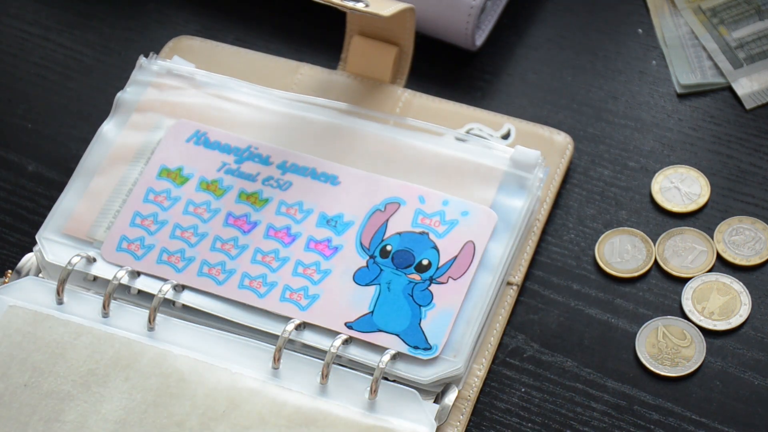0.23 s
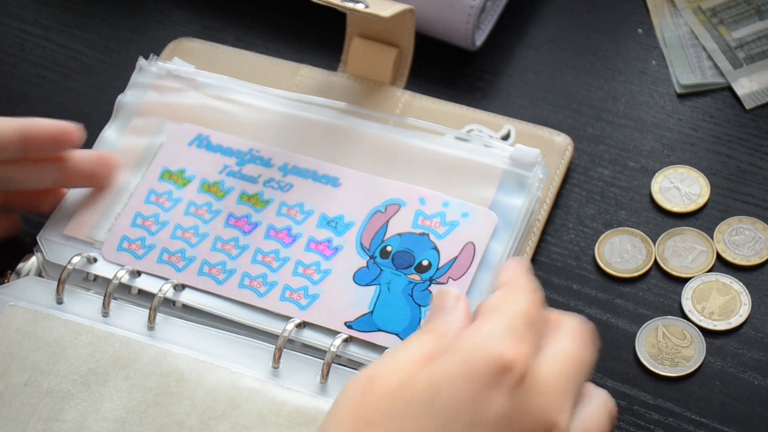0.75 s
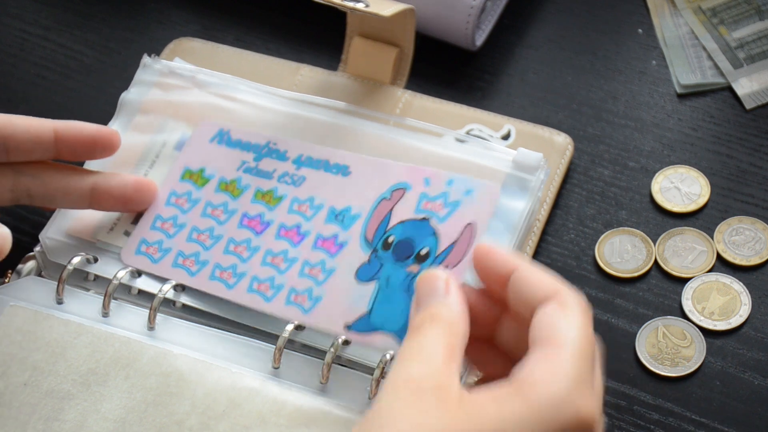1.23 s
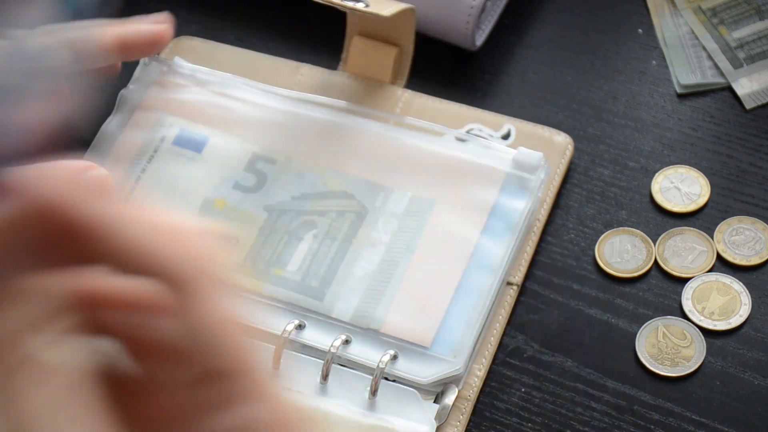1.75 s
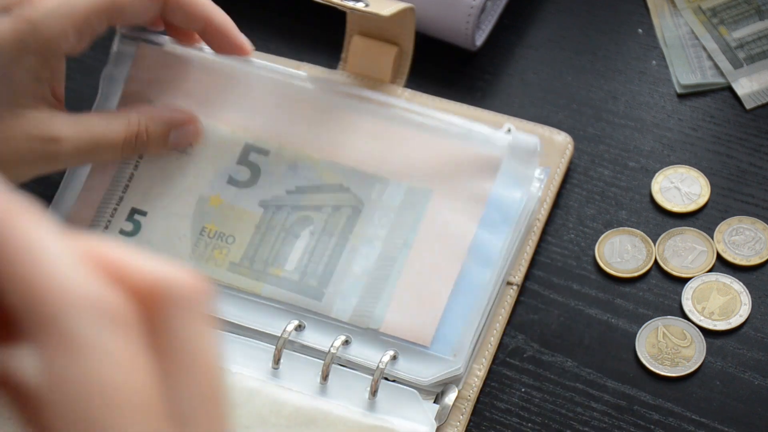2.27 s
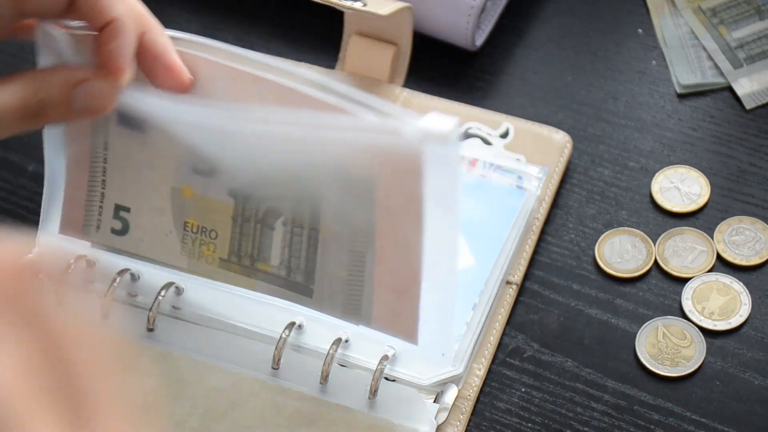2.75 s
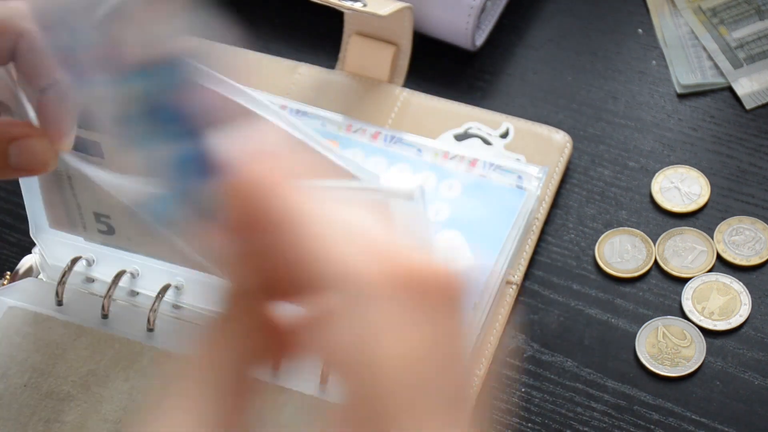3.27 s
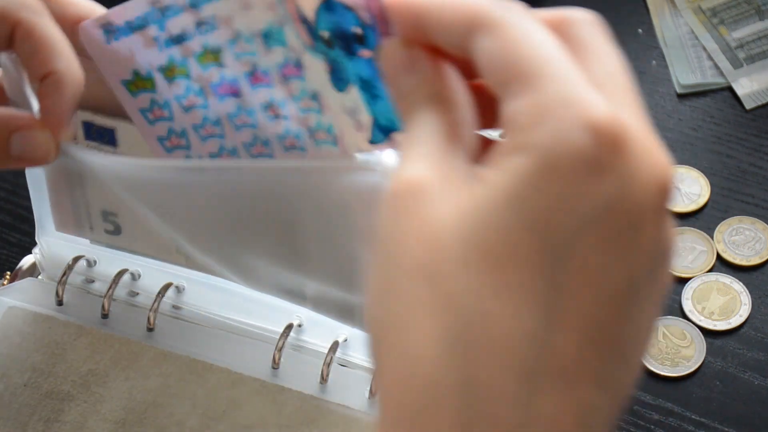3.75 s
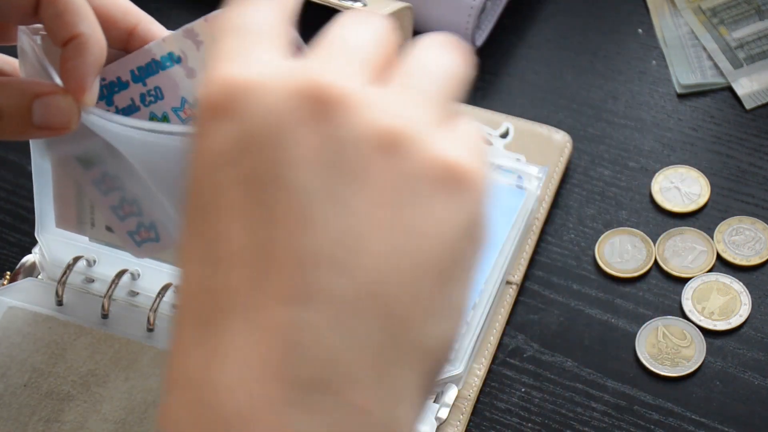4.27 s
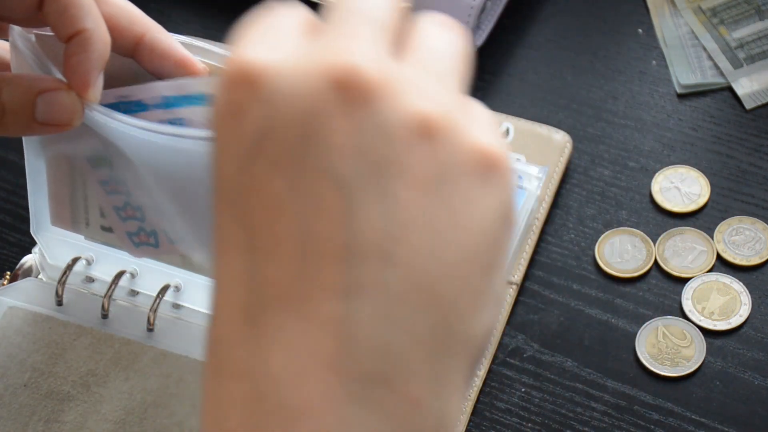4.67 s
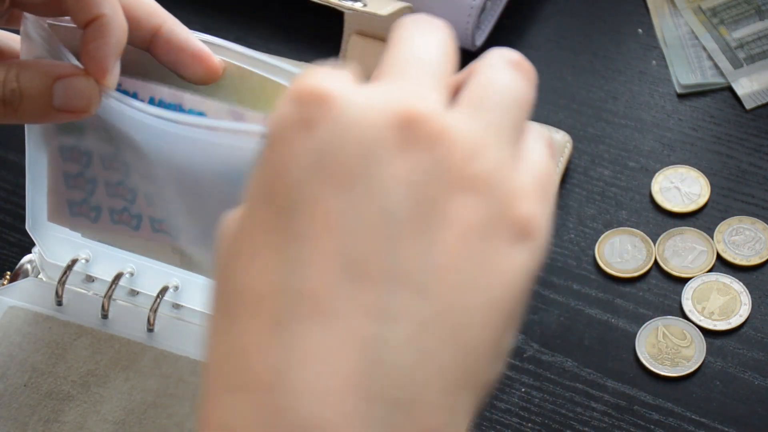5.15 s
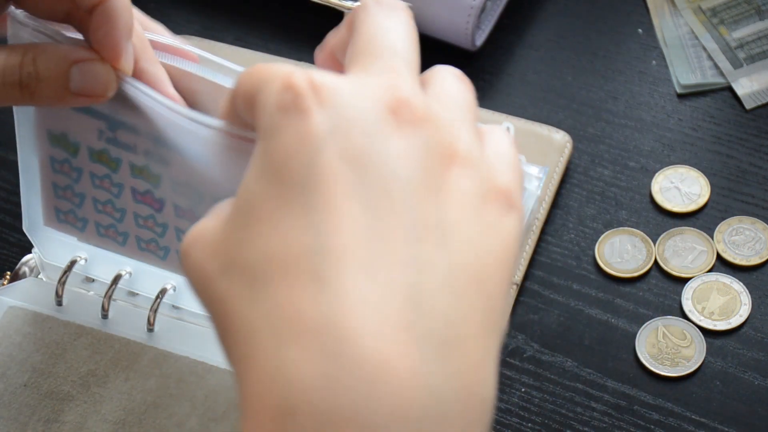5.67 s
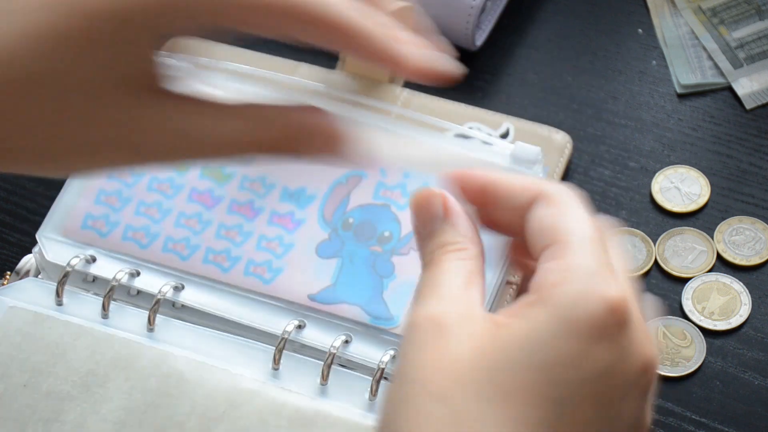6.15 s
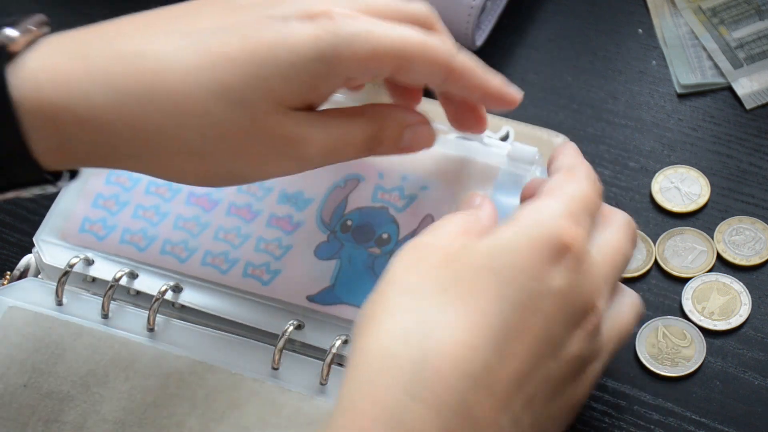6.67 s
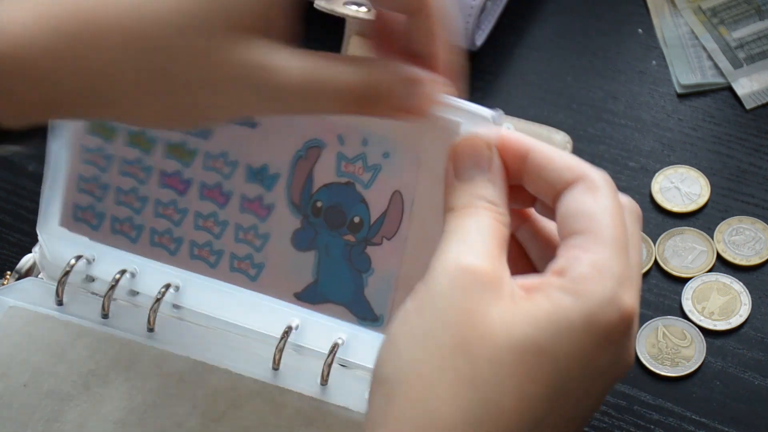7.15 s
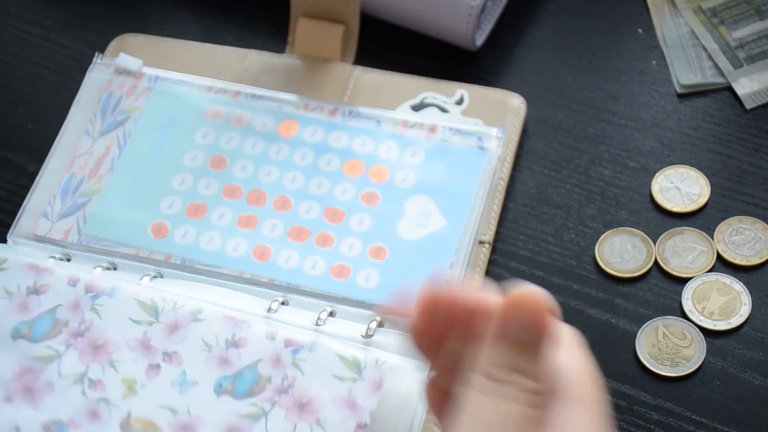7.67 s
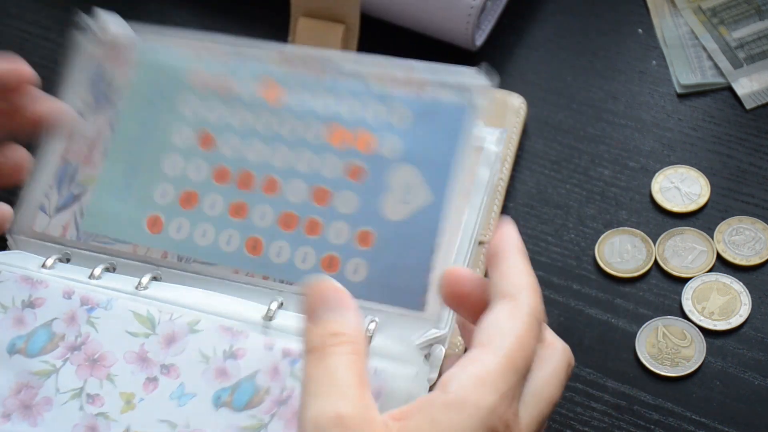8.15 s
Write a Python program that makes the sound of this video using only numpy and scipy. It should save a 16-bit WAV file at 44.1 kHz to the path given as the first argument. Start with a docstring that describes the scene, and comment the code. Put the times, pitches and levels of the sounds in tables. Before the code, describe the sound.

A hard clap on a table rings briefly, then a stiff plastic sheet wobbles with rising whups before pouches rustle, slide and tick in a small room.

```python
"""Plastic pouches in a ring binder are handled at a table in a small, live room, over quiet, dull room noise.
Near the start something hard claps down and rebounds: noise bursts, a ringing table top and low thumps.
Then a stiff plastic sheet wobbles to and fro with rising whups, each a sine sweeping upward with a noisy pop.
Last, the sheet slides into a pouch and pages turn: swells of grainy noise rustle, short noise bursts tick
on the rings, and low, dying sines knock softly; a few of these sound earlier too."""
import sys
import numpy as np
from scipy import signal
from scipy.fft import rfft, irfft, next_fast_len
from scipy.io import wavfile
from scipy.ndimage import map_coordinates

SR = 44100
rng = np.random.default_rng(int(sys.argv[2]) if len(sys.argv) > 2 else 0)


def output_pcm(signal):
    """Save a mono or channel-first signal as 16-bit PCM at the path in sys.argv[1].

    Samples are clipped to [-1, 1] before scaling.
    """
    pcm = np.clip(np.atleast_2d(signal).T, -1, 1) * 32767
    wavfile.write(sys.argv[1], SR, np.round(pcm).astype(np.int16))


N = 371275  # length in samples


def amp(db):
    """Decibels to gain."""
    return 10 ** (np.asarray(db) / 20)


def unit(x):
    """Scale to rms 1."""
    return x / np.sqrt(np.mean(x ** 2) + 1e-20)


def along(points, hz):
    """Read a curve of (Hz, value) points on a logarithmic frequency axis."""
    point_hz, values = np.transpose(points)
    return np.interp(np.log(hz + 1), np.log(point_hz + 1), values)


def colour(x, points):
    """Minimum-phase filter with the given (Hz, dB) gain, so nothing sounds before its cause."""
    size = 2 * next_fast_len(len(x) // 2 + 2048)
    gain = amp(along(points, np.fft.rfftfreq(size, 1 / SR)))
    # folding the cepstrum onto positive time makes the filter causal
    cepstrum = irfft(np.log(gain))
    cepstrum[1:size // 2] *= 2
    cepstrum[size // 2 + 1:] = 0
    response = np.exp(rfft(cepstrum))
    return irfft(rfft(x, size) * response)[:len(x)]


def add(track, start_s, sound):
    """Mix a sound into the track, cut off at the track's end."""
    part = track[round(start_s * SR):][:len(sound)]
    part += sound[:len(part)]


def wobble(rate):
    """A smooth random curve through `rate` random knots a second."""
    knots = rng.standard_normal(int(N * rate / SR) + 4)
    return map_coordinates(knots, [np.arange(N) * rate / SR])


# How long the room rings. Each row: frequency in Hz, time to fall by 60 dB in seconds.
ROOM_DECAY = [(100, 0.32), (400, 0.37), (1000, 0.38), (2000, 0.39), (5000, 0.36), (12000, 0.29)]


def reflections(early_db, tail_db):
    """A quick scatter off the table and near walls, then a room tail that dies at its own pace in each band."""
    hz, frame_s, bands = signal.stft(rng.standard_normal(SR // 2), SR, nperseg=256)
    decay = amp(-60 * frame_s / along(ROOM_DECAY, hz)[:, None])
    tail = signal.istft(bands * decay, SR, nperseg=256)[1]
    t = np.arange(len(tail)) / SR
    tail *= 1 - np.exp(-t / 0.0034)
    # cubed noise is spiky, like separate early echoes
    early = rng.standard_normal(len(t)) ** 3
    early *= amp(-60 * t / 0.15) * (1 - np.exp(-(t / 0.0018) ** 2))
    return amp(tail_db) * tail / np.linalg.norm(tail) + amp(early_db) * early / np.linalg.norm(early)


def burst(t60, spectrum, early_db, tail_db):
    """A dying crack of coloured noise in the room, with the energy of 4 ms at rms 1."""
    echo = reflections(early_db, tail_db)
    t = np.arange(len(echo)) / SR
    crack = rng.standard_normal(len(echo)) * amp(-60 * t / t60)
    x = colour(crack / np.linalg.norm(crack) + echo, spectrum)
    return x / np.linalg.norm(x) * np.sqrt(.004 * SR)


def friction(spectrum, slips_per_s, grain_db):
    """Coloured noise of rms 1 with tiny stick-slip grains in it."""
    slips = (rng.random(N) < slips_per_s / SR) * rng.standard_normal(N)
    rough = amp(grain_db) * unit(slips) + rng.standard_normal(N)
    return unit(colour(rough, spectrum))


# Tone of the room noise. Each row: frequency in Hz, gain in dB.
AIR_TONE = [(20, -13), (50, -9), (110, -3), (220, -1.5), (420, -2), (800, -1), (1300, -4), (2000, -7.5),
            (3200, -14.5), (5000, -23), (7500, -27), (12500, -31), (13500, -44.5), (15500, -42)]
AIR_DB = -65.5  # rms level around which the noise drifts


def air():
    """Dull room noise whose level drifts very slightly."""
    noise = unit(colour(rng.standard_normal(N), AIR_TONE))
    return amp(AIR_DB + 0.72 * wobble(3.8)) * noise


# Low thumps: the first two under the clap, the rest soft knocks on binder and table.
# Each row: start in seconds, level in dB, pitch in Hz.
THUMPS = [(.410, -51, 105), (0.411, -38, 237), (.763, -59, 112), (0.917, -49.5, 117), (3.782, -49, 340),
          (3.857, -53.5, 275), (5.928, -52, 112), (7.307, -56, 102), (7.871, -56, 106), (8.348, -52, 115)]


def bumps(t60=0.1):
    """Low thumps under the clap, then soft knocks on binder and table: quickly dying sines with a round onset."""
    out, t = np.zeros(N), np.arange(SR // 4) / SR
    for start_s, db, hz in THUMPS:
        thump = np.sin(2 * np.pi * hz * t) * amp(-60 * t / t60) * (1 - np.exp(-t / 0.0077))
        add(out, start_s, amp(db) * thump)
    return out


# Strokes of sliding plastic, as bell-shaped swells, also used by the creases.
# Each row: middle in seconds, spread in seconds, rub in dB, hiss in dB (both before the layer trims).
SLIDES = [(0.399, 0.017, -50, -60.5), (0.775, 0.059, -70.5, -81), (1.223, 0.053, -67.5, -78.5),
          (3.809, 0.024, -61, -75), (3.991, 0.063, -70, -72), (4.425, .03, -69.5, -95),
          (4.62, 0.1, -74, -79), (4.741, .03, -68.5, -81), (4.92, .04, -65.5, -78.5),
          (5.149, .045, -61.5, -75.5), (5.673, 0.073, -74, -83), (5.823, .015, -68, -77.5),
          (5.955, 0.038, -73, -81), (6.922, 0.021, -74, -83), (7.321, 0.055, -64.5, -76.5),
          (7.538, 0.044, -53.5, -67.5), (7.864, 0.11, -69, -77), (8.207, .018, -59.5, -74),
          (8.356, 0.047, -67, -76)]
# Between strokes the hands keep shifting on the pouches.
# One row: middle in seconds, spread in seconds, rub in dB, hiss in dB (both before the layer trims).
SHIFTING = (5.5, 9, -76, -94)
# A sliding edge briefly sings at one resonance.
# Each row: middle in seconds, spread in seconds, pitch in Hz, level in dB before the stroke's reflections.
SINGING_EDGES = [(3.99, 0.077, 1770, -68.5), (4.024, 0.018, 2470, -63.5), (4.638, 0.016, 1690, -56.5),
                 (7.316, .04, 860, -60.5), (7.85, 0.044, 5830, -77), (7.91, 0.048, 2280, -65.5),
                 (8.365, 0.011, 810, -57.5)]
# Tone of the dull rub. Each row: frequency in Hz, gain in dB.
RUB_TONE = [(50, -18.5), (100, -3.5), (180, -4.5), (300, -5), (500, -5.5), (850, -1.5), (1200, -5.5),
            (1800, -0.5), (3000, -14), (4500, -23), (8000, -45)]
# Tone of the hissing skin. Each row: frequency in Hz, gain in dB.
HISS_TONE = [(1200, -24), (2300, 2), (4200, 12), (6500, 1.5), (10000, -1.5), (13000, -4.5), (16000, -24)]
# Tone of crinkling plastic, also the snap of the creases. Each row: frequency in Hz, gain in dB.
CRINKLE_TONE = [(600, -13), (1800, 5.5), (3000, 24.5), (4500, -7), (7000, -6.5), (13000, -35)]


def rustle(rub_db=-1, hiss_db=-1, crinkle_db=-1, scrape_width=0.064):
    """Each stroke swells and fades: a dull rub, hiss and crinkles from the pouch's skin, at times a singing edge."""
    t = np.arange(N) / SR

    def swell(middle_s, spread_s):
        """A bell-shaped rise and fall."""
        return np.exp(-np.minimum(((t - middle_s) / spread_s) ** 2 / 2, 20))

    strokes = SLIDES + [SHIFTING]
    pressure = sum(amp(db) * swell(middle_s, spread_s) for middle_s, spread_s, db, _ in strokes)
    speed = sum(amp(db) * swell(middle_s, spread_s) for middle_s, spread_s, _, db in strokes)
    rub = amp(rub_db) * pressure * friction(RUB_TONE, slips_per_s=200, grain_db=-3.5)
    hiss = amp(hiss_db) * speed * friction(HISS_TONE, slips_per_s=450, grain_db=-6.0)
    # sparse, strong grains make the crackle
    crinkle = amp(crinkle_db) * speed * friction(CRINKLE_TONE, slips_per_s=70, grain_db=20)
    out = (rub + hiss + crinkle) * amp(1.03 * wobble(35))  # the level wavers slightly
    for middle_s, spread_s, hz, db in SINGING_EDGES:
        band = [hz * (1 - scrape_width), hz * (1 + scrape_width)]
        edge = signal.butter(2, band, "band", fs=SR, output="sos")
        singing = unit(signal.sosfilt(edge, rng.standard_normal(N)))
        out += amp(db) * swell(middle_s, spread_s) * singing
    return out + signal.fftconvolve(out, reflections(early_db=-6.5, tail_db=-13.0))[:N]


# Hollow body of a crease, a tick or the sheet's pop. Each row: frequency in Hz, gain in dB.
BODY_TONE = [(80, -20), (250, -5.5), (600, 2), (1100, 1.5), (1900, 1), (3000, -7.5), (4500, -25.5),
             (9000, -39)]


def creases(count=4, body_db=13, snap_db=5, scatter_db=5):
    """Every stroke flips a few small creases at chance moments; a stroke with more hiss flips them harder."""
    flips = np.zeros(N)
    for middle_s, spread_s, _, hiss_db in SLIDES:
        for when, size in rng.uniform(-1, 1, (count, 2)):
            add(flips, middle_s + 1.3 * spread_s * when, [amp(hiss_db + scatter_db * size)])
    body = burst(.008, BODY_TONE, early_db=-8, tail_db=-6)
    snap = burst(.004, CRINKLE_TONE, early_db=-14, tail_db=-10)
    return signal.fftconvolve(flips, amp(body_db) * body + amp(snap_db) * snap)[:N]


# Creases flip and pouch edges catch.
# Each row: start in seconds, body in dB, snap in dB, tilt of the snap's tone in dB per octave.
CATCHES = [(0.362, -48, -45, -3), (0.3758, -49, -47.5, 1.5), (0.4092, -31, -35.5, 2.5),
           (0.4749, -28, -37, -9), (.763, -54.5, -69, 4), (1.166, -55.5, -60, -14), (1.212, -50, -64, 7),
           (1.720, -65, -67.5, 6), (3.8544, -47, -57, -11.5), (4.002, -63, -58.5, 0), (4.373, -59, -72, 3),
           (4.56, -56.5, -71, -3), (4.6228, -48, -57.5, -2), (4.910, -69, -65, -5), (5.823, -58, -65, 1),
           (5.952, -62, -63.5, -3), (6.092, -44.5, -47.5, -4.5), (6.097, -48, -57, 8),
           (6.908, -55, -67, -2), (7.307, -66, -55.5, 9), (7.432, -54, -64.5, -1), (7.545, -35.5, -62, 9),
           (7.668, -47.5, -58, 5), (7.674, -50.5, -51.5, -8), (7.894, -54, -70, -9),
           (7.9028, -52.5, -63, -10), (8.139, -49, -74, -14), (8.143, -48, -68, -9),
           (8.2462, -42.5, -61, -2), (8.3183, -47, -65, -2), (8.3439, -40, -53, 3)]
# Tone of the snap before its tilt. Each row: frequency in Hz, gain in dB.
SNAP_TONE = [(1000, -32.5), (2500, 5), (3500, 6.5), (4700, 4), (6000, -1), (9000, -5), (12000, -15),
             (16000, -26)]


def ticks():
    """Creases flip and pouch edges catch on the rings: a sharp noise snap over a hollow body."""
    out = np.zeros(N)
    for start_s, body_db, snap_db, tilt in CATCHES:
        tilted = [(hz, db + tilt * np.log2(hz / 5000)) for hz, db in SNAP_TONE]  # pivots at 5 kHz
        add(out, start_s, amp(body_db) * burst(0.013, BODY_TONE, early_db=-6, tail_db=-4.0))
        add(out, start_s, amp(snap_db) * burst(.007, tilted, early_db=-12, tail_db=-8))
    return out


# The blow and its rebounds. Each row: start in seconds, level in dB.
BLOWS = [(0.4074, -16.5), (0.4156, -25.5), (0.4332, -21.5), (0.4758, -31.5)]
# Modes of the table top. Each row: frequency in Hz, relative level in dB, time to fall by 60 dB in seconds.
TABLE_MODES = [(579, -1, 0.23), (680, -6, 0.37), (739, -2, 0.2), (893, -4.5, 0.37), (1080, 15, 0.25),
               (1000, -1.5, 0.22), (1047, -4.5, 0.43), (1128, 9, 0.14), (1573, 0, 0.18), (1640, 7.5, 0.39),
               (1580, -4, 0.62), (1707, 2, 0.28), (1840, -15, .3), (1971, -10, 0.16), (2200, -16, .36),
               (2460, -6, 0.47)]
# Tone of the broad thud. Each row: frequency in Hz, gain in dB.
THUD_TONE = [(40, -41), (100, -7.5), (180, -14.5), (350, -16.5), (550, -1), (1000, 0.5), (1500, 0.5),
             (2100, -0.5), (2900, -17.5), (4300, -17), (6000, -31.5), (10000, -38), (15000, -64)]


def clap(ring_db=-8):
    """A hard flat blow: a broad noise thud and the table top ringing as dying sines."""
    out, t = np.zeros(N), np.arange(SR // 2) / SR
    for start_s, db in BLOWS:
        ring = np.zeros(len(t))
        for hz, mode_db, t60 in TABLE_MODES:
            ring += amp(mode_db - 60 * t / t60) * np.sin(2 * np.pi * (hz * t + rng.random()))
        ring *= (1 - np.exp(-t / .002)) / np.max(np.abs(ring))
        add(out, start_s, amp(db) * burst(0.058, THUD_TONE, early_db=-2.0, tail_db=-1.5))
        add(out, start_s, amp(db + ring_db) * ring)
    return out


# The sheet buckles hard once in every swing, then pops right through.
# Each row: start in seconds, level in dB before the sheet's own tone and trim, bend time in seconds,
# wait until it pops through in seconds.
HARD_BUCKLES = [(2.0100, -24, 0.0065, .002), (2.2988, -25, .010, 0.0088), (2.565, -23, 0.0051, 0.008),
                (2.8373, -23.5, 0.0093, .008), (3.084, -22.5, .007, .013)]
BUCKLE_FROM_HZ, BUCKLE_TO_HZ = 482, 2175  # every buckle sweeps through the same range
# Popping through is quicker and starts higher: level against the buckle, bend time, start pitch.
THROUGH_DB, THROUGH_BEND_S, THROUGH_FROM_HZ = -4, 0.00503, 797
# It bends softly on the way back, and as the shaking starts and stops.
# Each row: start in seconds, level in dB before the sheet's own tone and trim, bend time in seconds,
# top pitch in Hz.
SOFT_BENDS = [(1.7187, -40, 0.022, 1810), (1.882, -49.5, 0.0159, 1600), (2.166, -34.5, 0.013, 1970),
              (2.446, -38.5, 0.011, 1786), (2.72, -38.5, 0.019, 1470), (2.978, -39, .007, 1740),
              (3.182, -31.5, 0.00704, 1886), (3.262, -50.5, 0.01, 680), (3.326, -51.5, 0.0067, 356)]
BEND_FROM_HZ, BEND_HEAD_START_S = 177, .002  # starts above this pitch, the more so the quicker it is
# Before a soft bend the sheet gives a little: time ahead and bend time, level against the bend, pitch ratio.
LEAD_S, LEAD_DB, LEAD_RISE = 0.008, -12, 1.8


def flexes():
    """Every movement of the sheet as (start s, level dB, bend time s, start Hz, end Hz)."""
    moves = []
    for start_s, db, bend_s, wait_s in HARD_BUCKLES:
        moves.append((start_s, db, bend_s, BUCKLE_FROM_HZ, BUCKLE_TO_HZ))
        moves.append((start_s + wait_s, db + THROUGH_DB, THROUGH_BEND_S, THROUGH_FROM_HZ, BUCKLE_TO_HZ))
    for start_s, db, bend_s, top_hz in SOFT_BENDS:
        from_hz = BEND_FROM_HZ + top_hz * BEND_HEAD_START_S / bend_s
        moves.append((start_s - LEAD_S, db + LEAD_DB, LEAD_S, from_hz, from_hz * LEAD_RISE))
        moves.append((start_s, db, bend_s, from_hz, top_hz))
    return moves


# How well the sheet radiates. Each row: frequency in Hz, gain in dB.
SHEET_TONE = [(25, -20), (60, -10), (150, -3), (320, -0.5), (450, -.5), (700, -1), (1100, -7), (1450, -4.5),
              (2200, -2), (3000, -3.5), (4200, -10), (6000, -58.5)]
# The sheet's resonances. Each row: frequency in Hz, width in Hz, level in dB.
RESONANCES = [(129, 28, -7.5), (266, 20, -1), (656, 18, -6.5), (848, 23, -4), (1354, 15, 3), (1600, 70, -8),
              (2060, 12, -11), (2480, 25, -9), (2673, 19, 5)]
# Nearby hard surfaces. Each row: delay in seconds before its random stretch, level in dB.
NEAR_SURFACES = [(.0027, -12.5), (.0058, -5.5), (.0093, -21)]


def sheet(overtone_db=-22, pop_db=-8, flutter_db=5.0, ring_db=0):
    """Bending stiffens the sheet, so its note shoots upward; slow bends pop through more gently."""
    out, t = np.zeros(N), np.arange(SR // 8) / SR
    for start_s, db, bend_s, from_hz, to_hz in flexes():
        u = t / bend_s  # progress: 1 at the end of the bend
        pitch = from_hz + (to_hz - from_hz) * np.minimum(u, 1.1)  # overshoots a little
        phase = 2 * np.pi * np.cumsum(pitch) / SR
        swell = (1 - np.exp(-u / 0.066)) * np.exp(-np.minimum(u / 0.85, 3) ** 4)
        # waves run to and fro across the sheet, 210 times a second
        flutter = amp(flutter_db * np.sin(2 * np.pi * (210 * t + rng.random())))
        note = swell * flutter * (np.sin(phase) + amp(overtone_db) * np.sin(2 * phase))
        hardness = min(0.0089 / bend_s, 1) ** 2
        pop = amp(pop_db) * hardness * burst(0.09, BODY_TONE, early_db=-3.0, tail_db=2.5)
        answer = reflections(early_db=1.5, tail_db=-4.0)
        answer[0] += 1  # the direct sound
        for delay_s, bounce_db in NEAR_SURFACES:
            # each echo's delay is stretched at random
            add(answer, delay_s * rng.uniform(0.855, 1.3), [amp(bounce_db)])
        whup = signal.fftconvolve(answer, note)[:len(pop)] + pop
        add(out, start_s, amp(db - 1.5) * colour(whup, SHEET_TONE))
    ring = np.zeros(N)
    for hz, width_hz, mode_db in RESONANCES:
        ring += amp(mode_db) * signal.lfilter(*signal.iirpeak(hz, hz / width_hz, SR), out)
    return out + amp(ring_db) * ring


def scene():
    """Everything at one microphone above the table."""
    background = air() + bumps()
    handling = rustle() + creases() + ticks()
    return (background + handling + clap() + sheet())[None]


TOP_HZ = 15300  # nothing passes from here up


def record(dry):
    """A sharp band limit at the top, and a converter that sits slightly off zero."""
    size = next_fast_len(N + SR // 2)
    kept = np.fft.rfftfreq(size, 1 / SR) < TOP_HZ
    offset = .0006  # of full scale
    return irfft(rfft(dry, size) * kept, size)[:, :N] + offset


dry = scene()
out = record(dry)
output_pcm(out)
```